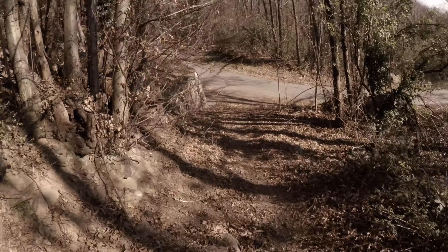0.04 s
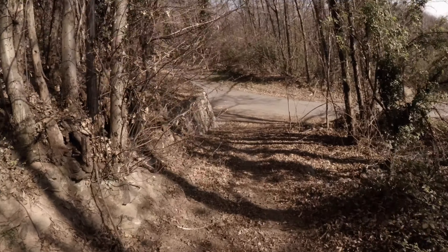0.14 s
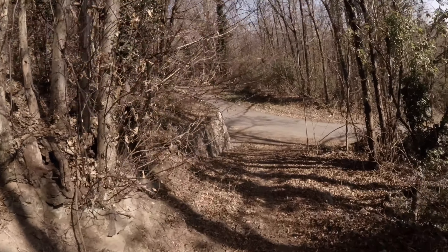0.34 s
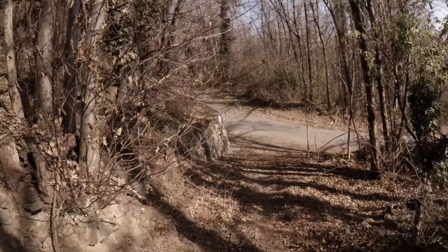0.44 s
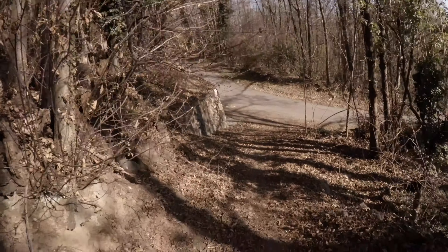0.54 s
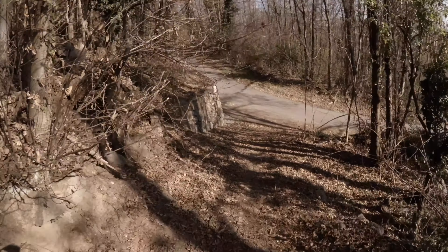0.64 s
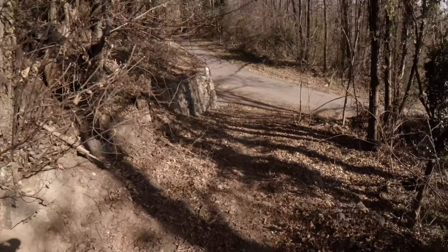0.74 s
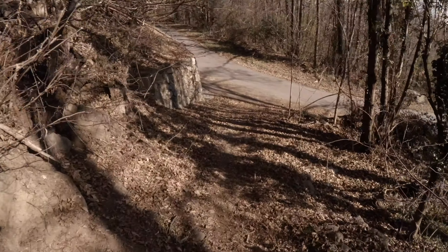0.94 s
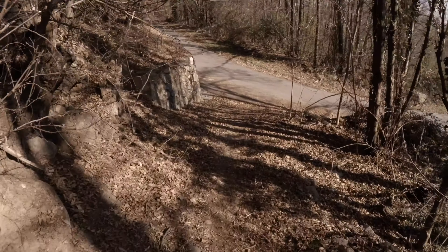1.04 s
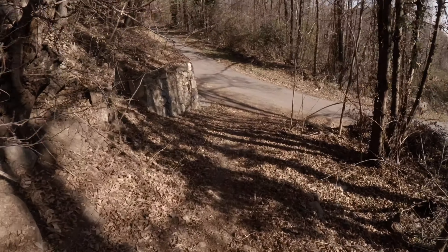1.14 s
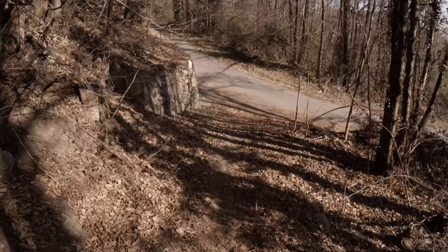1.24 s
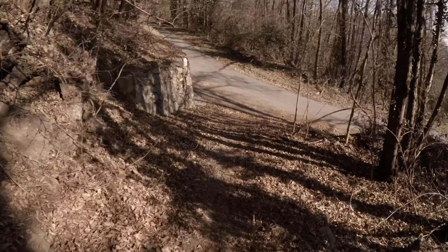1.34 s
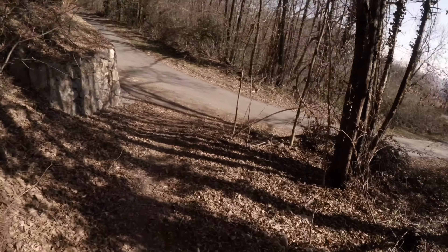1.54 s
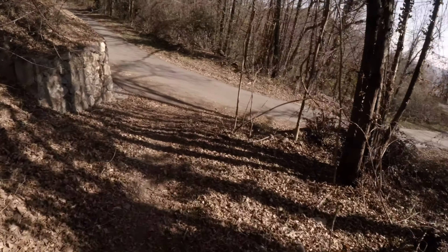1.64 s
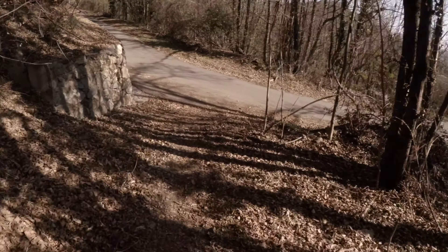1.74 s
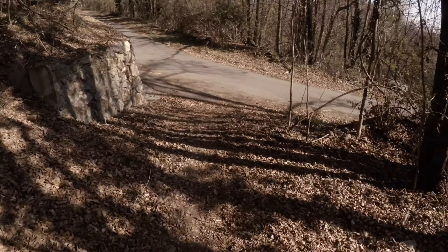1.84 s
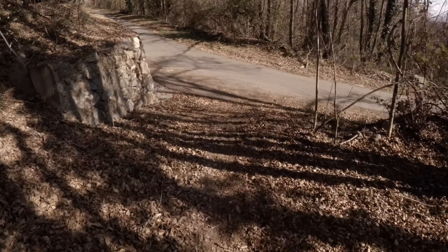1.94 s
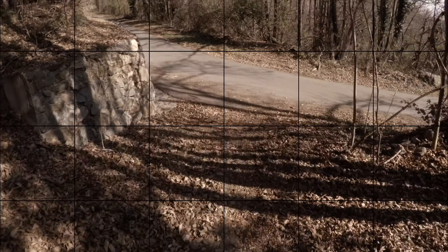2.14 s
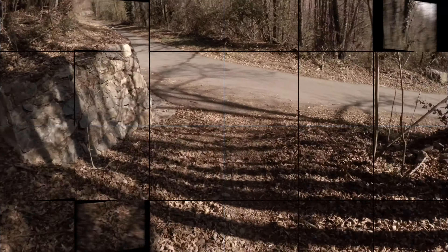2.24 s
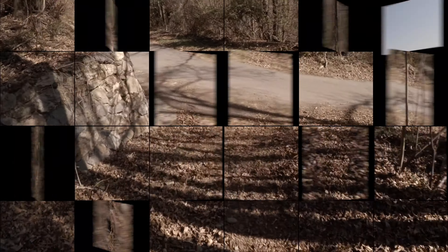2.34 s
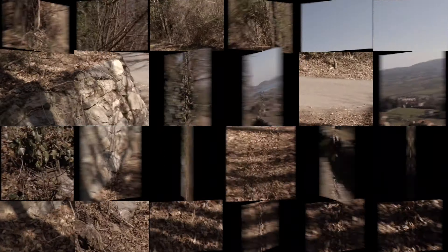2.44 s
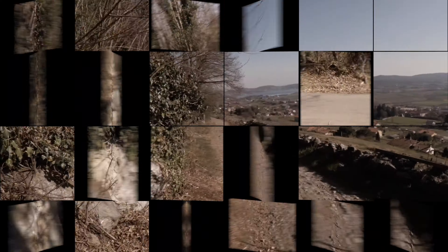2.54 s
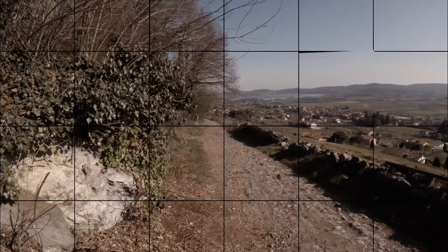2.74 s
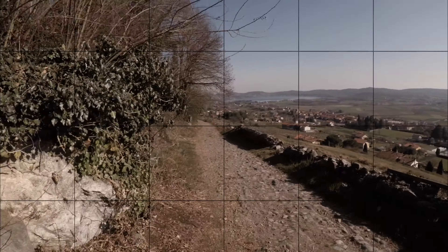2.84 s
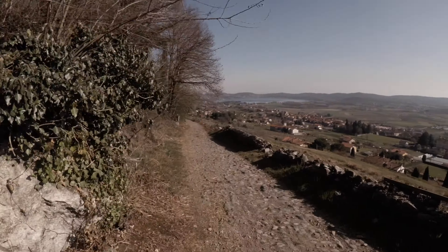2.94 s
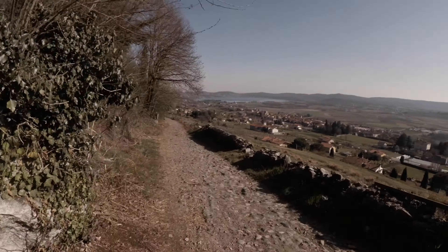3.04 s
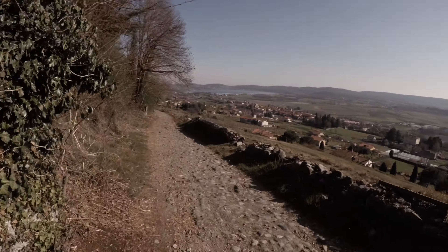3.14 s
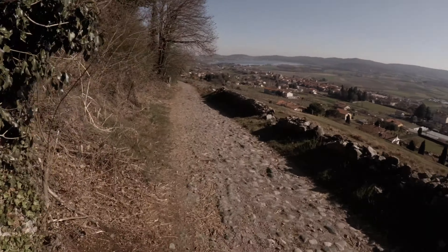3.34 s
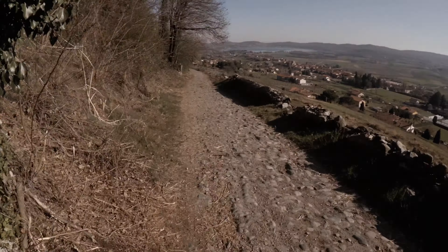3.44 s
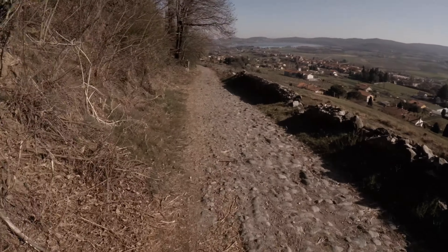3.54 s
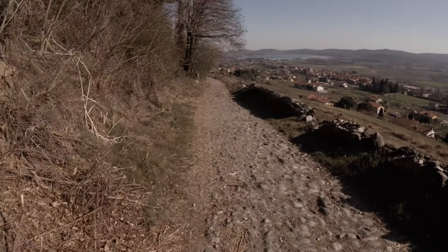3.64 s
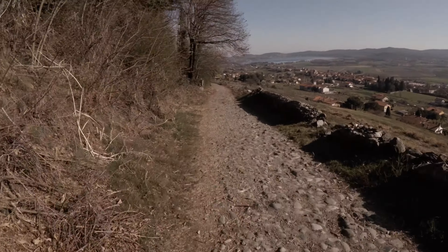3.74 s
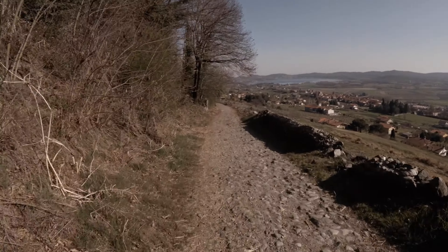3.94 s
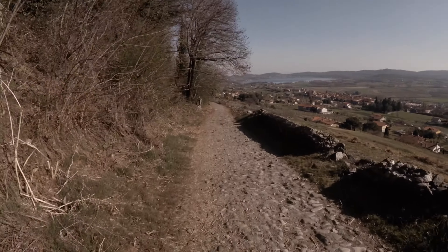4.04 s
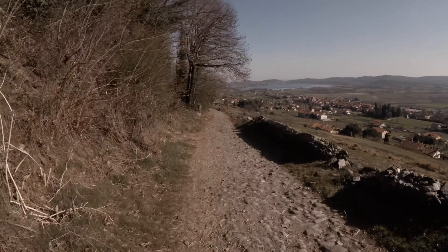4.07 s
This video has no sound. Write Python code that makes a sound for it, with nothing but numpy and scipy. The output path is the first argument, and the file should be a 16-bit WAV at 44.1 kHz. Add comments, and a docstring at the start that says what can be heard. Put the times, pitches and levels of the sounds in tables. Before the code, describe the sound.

A mountain bike coasts over leaf litter, brittle crackle spread wide, with low fluttering wind and a high ratchet whir. The leaves thin out and the bike reaches an open stony track: a heavy knock, then louder gritty tyre roll, clicking pebbles, sharp gravel ticks and deep frame rumble growing with speed. Close on-board microphone, no reverberation, image narrowing to the centre.

```python
"""Mountain bike from leaves to cobbles

A bike with a camera on board coasts through dry leaves, then rolls faster down a cobbled track.
Tyres, litter and sand are random grains shaped by spectra; stones, snaps and knocks are struck resonances.
The freewheel is a pulse train ringing a wavering tone, and wind is filtered noise swelling in gusts.
The stereo image starts wide and closes to mono as the track begins."""
import sys
import numpy as np
from scipy import signal
from scipy.fft import rfft, irfft, next_fast_len
from scipy.io import wavfile
from scipy.ndimage import uniform_filter1d, minimum_filter1d, map_coordinates

SR = 44100
rng = np.random.default_rng(int(sys.argv[2]) if len(sys.argv) > 2 else 0)


def file_out(sig):
    """Save sig as 16-bit WAV at sys.argv[1]."""
    # one column per channel
    cols = np.atleast_2d(sig).T
    # limit, then scale
    lim = np.clip(cols, -1, 1)
    pcm = np.round(lim * 32767).astype(np.int16)
    wavfile.write(sys.argv[1], SR, pcm)


N = 383229
TIME = np.arange(N) / SR  # seconds, for each sample

# Levels of layers and hits are set ahead of panning; colours give relative level within a spectrum.

# bike speed, rising and easing, faster overall by the end: [t/s, speed/(m/s)]
SPEED = [(0, 2.75), (.85, 3.1), (1.3, 5.2), (2.4, 3.07), (3.4, 5.16), (4.5, 4.5), (4.9, 6.27), (5.4, 5.3),
         (6.95, 6.56), (7.5, 6.4), (8.35, 7.6), (8.69, 7)]
# tyres on the ground: [t/s, roll level/dB, grit level/dB]
TYRES = [(0.0, -41.5, -48), (0.43, -36, -46), (1.18, -40, -44), (1.7, -41.5, -49.5), (2.15, -33.5, -45.5),
         (2.44, -35, -45), (2.73, -40.5, -45), (3.29, -40, -61), (3.53, -37, -51.5), (4.13, -33.5, -47.5),
         (4.6, -35, -45), (4.95, -30, -41.5), (5.6, -30.5, -40), (6.17, -33.5, -41), (6.55, -31.5, -39.5),
         (7.25, -29.5, -39), (7.6, -33.5, -38.5), (7.95, -33.5, -40.5), (8.34, -29, -39.5),
         (8.68, -35.5, -42.5)]
# bumps press the tyres down (+) or lift them (-): [t/s, length/s, change of level/dB]
BUMPS = [(0.51, 0.14, -16), (2.806, 0.21, -7.5), (3.316, .05, -2.5), (3.357, 0.029, 5), (3.58, 0.24, 4.5),
         (4.116, 0.022, -1), (4.154, 0.081, 4.5), (4.261, 0.032, 5), (4.838, 0.1, 2.5), (4.978, 0.034, 3.5),
         (5.579, 0.052, 4.5), (5.798, 0.078, 2), (5.88, 0.049, -2.5), (6.271, 0.16, -2.5),
         (7.133, 0.092, 0.5), (8.558, 0.051, 6), (8.664, 0.025, -6.5)]
# colour of the rolling tread: [f/Hz, level/dB]
ROLL = [(200, -37), (450, -2), (750, -1.5), (1050, 0), (1450, 2.5), (1900, -4.5), (2600, -12), (3600, -64),
        (6000, -65.5)]
# colour of the grinding grit: [f/Hz, level/dB]
GRIT = [(1000, -4.5), (2000, 4.5), (2600, 5.5), (3500, -0.5), (4700, -8), (5400, -22), (7500, -26.5),
        (14000, -68)]

# stones and sticks hit by a tyre: [t/s, peak level before softening/dB, ring f/Hz, resonance Q]
STONES = [(0.034, -16, 1250, 1.2), (0.0689, -16, 1460, 1.3), (0.2377, -5.5, 920, 1.3),
          (.5584, -13, 1980, 1.2), (0.9526, -8, 1100, 1.17), (1.403, -18, 1390, 2.2),
          (1.461, -16, 1020, 2.04), (1.956, -17.5, 1170, 2.2), (2.324, -11, 1070, 1.6),
          (2.923, -13.5, 1040, 1.16), (2.932, -16, 1000, 1.2), (3.234, -14, 880, 3.3),
          (3.248, -16.5, 615, 4), (3.283, -22, 554, 3), (3.352, -23, 1310, 3.3), (3.389, -17, 1120, 0.97),
          (3.449, -21.5, 1720, 2.4), (3.468, -17, 620, 1.9), (3.526, -12.5, 1540, 3.3),
          (3.591, -22, 1120, 2.6), (3.622, -19, 1370, 3), (3.743, 3, 990, 1.84), (3.813, -15.5, 1410, 3.8),
          (3.855, -12, 1093, 0.86), (3.984, -20, 1650, 2.1), (4.087, -10, 940, 3.6),
          (4.424, -11, 1464, 3.1), (4.479, -17, 606, 3.1), (4.582, -20, 560, 1.8), (4.658, -21, 625, 1.7),
          (4.896, -13.5, 1800, 1.6), (4.968, -15, 1140, 2), (5.068, -9.5, 1940, 1.9),
          (5.262, -15.5, 1560, 3.6), (5.35, -22, 1410, 2.5), (5.776, -17, 1190, 1.7),
          (6.003, -11.5, 1510, 1.2), (6.244, -10, 1310, 4.2), (6.311, -8.5, 1670, 1.35),
          (6.588, -12.5, 1006, 10), (6.639, -20, 640, 3.9), (6.929, -19, 1076, 7.8),
          (7.108, -16, 1290, 3.3), (7.671, -15, 660, 1.7), (7.893, -21, 1240, 2.5), (8.042, -13, 1190, 1.3),
          (8.143, -13, 785, 2), (8.213, -15.5, 840, 2.6), (8.273, -18.5, 988, 2.2), (8.54, -9, 1300, 2.5),
          (8.565, -14.5, 1400, 3), (8.634, -22, 800, 1.8), (8.648, -9, 870, 1.7)]
# sharp snaps of twigs, flung gravel and chain: [t/s, tick level/dB, ring f/Hz, edge level re tick/dB]
SNAPS = [(0.033, -25, 2820, -11), (.069, -29.5, 2880, -6), (0.2376, -20, 2940, -13), (.362, -22, 2910, -13),
         (.409, -19, 3080, -17.5), (0.5585, -21.5, 2800, 0.5), (.649, -25, 3040, -1.5),
         (.856, -19, 4300, -19), (.929, -22.5, 3800, -10), (0.9535, -25.5, 2560, 7),
         (1.076, -15, 2500, -11), (1.144, -12.5, 3190, -12), (1.178, -13.5, 3570, -11),
         (1.463, -22, 4240, -15), (2.582, -28, 4000, -4), (2.602, -24, 3020, -7), (2.623, -26.5, 3520, -9),
         (2.884, -28.5, 2330, -6), (2.921, -25, 2530, -15), (2.927, -15.5, 2900, -13),
         (2.9315, -15, 3220, -13.5), (2.936, -25, 2800, -6), (3.087, -26.5, 2540, -26),
         (3.47, -28, 2400, -19), (3.527, -33.5, 2460, 2.5), (3.73, -22, 2170, -29), (3.742, -19, 2740, -9),
         (3.855, -24, 2400, -9), (3.942, -27, 3400, -1), (3.98, -25.5, 2340, -15), (4.058, -15, 2940, -21),
         (4.26, -31, 2780, -1), (4.421, -18, 2540, -10), (4.532, -21, 2600, -28), (4.657, -18, 2360, -12),
         (4.747, -21.5, 2480, -15), (4.895, -27, 2510, -15), (4.985, -12.5, 3100, -28),
         (4.999, -12.5, 4200, -27), (5.07, -13.5, 2400, -10.5), (5.148, -25, 2960, -11),
         (5.17, -21, 2700, -26), (5.521, -26, 2430, -13), (5.642, -25, 3000, -13), (6.244, -28, 2290, -8),
         (6.31, -20, 2770, -16), (6.413, -22.5, 2800, -11), (6.849, -25, 3160, -24),
         (7.546, -21.5, 2910, -20.5), (7.712, -18.5, 2630, -30), (7.817, -19.5, 2600, -28),
         (8.044, -12.5, 2540, -32), (8.138, -15, 2900, -33), (8.151, -20, 2500, -30),
         (8.188, -20, 2900, -30), (8.193, -20.5, 4800, -26), (8.211, -14.5, 2460, -30),
         (8.471, -22, 3000, -20), (8.548, -24, 3250, -27), (8.558, -20, 3400, -28), (8.633, -21, 2400, -16)]
# short skids of the tread: [t/s, length/s, level/dB]
SKIDS = [(0.37, 0.11, -31), (1.166, 0.029, -32), (2.226, 0.018, -33), (2.928, 0.029, -23.5),
         (4.421, 0.011, -25), (8.482, 0.02, -43), (8.572, 0.04, -45)]
# colour of a skid: [f/Hz, level/dB]
SCRAPE = [(200, 7), (900, 15), (2000, 4.5), (3300, 6), (4800, -2), (7000, -14), (10000, -18.5),
          (15000, -39)]

# leaf crunch, fading towards the open track: [t/s, crunch level/dB]
LITTER = [(0, -43), (1.3, -42.5), (1.78, -49), (2.05, -50), (2.55, -53), (2.85, -55), (3.5, -95.5)]
# heaps of leaves that a tyre ploughs through: [t/s, length/s, level/dB]
LEAF_HEAPS = [(0.593, 0.028, -32), (0.788, 0.044, -37), (1.919, 0.023, -36), (2.018, 0.054, -37),
              (2.06, 0.03, -35), (2.097, 0.035, -37), (2.192, .03, -43.5), (2.228, 0.042, -36),
              (2.28, 0.046, -40.5), (2.33, 0.033, -42), (2.383, 0.04, -37)]
# colour of crushed leaves: [f/Hz, level/dB]
CRUNCH = [(2500, 4), (4500, 5), (6300, 1.5), (7500, -0.5), (9300, -4), (11000, -11.5), (13000, -14.5),
          (15000, -37.5)]
# colour of the crunch that differs between the ports: [f/Hz, level/dB]
CRUNCH_SIDE = [(900, 4), (1500, 6), (2200, 3.5), (2800, -4), (3400, -30), (4400, -0.5), (6300, 4),
               (8000, 0), (10000, -8.5), (13000, -22), (15000, -34)]
# colour of cracking leaf stalks and flung grit: [f/Hz, level/dB]
CRACKLE = [(600, -14), (1400, 9), (2400, -5.5), (4200, -2), (6500, -19), (10000, -12), (15000, -31.5)]
# sand, thickest on the first stretch of cobbles: [t/s, hiss level/dB]
SANDINESS = [(0, -73), (3.25, -63), (3.55, -57), (5.55, -58.5), (5.8, -64), (8.69, -66.5)]
# colour of the sand: [f/Hz, level/dB]
HISS = [(3000, -11.5), (4800, -7), (6000, -0.5), (7400, -8.5), (8300, 1), (9700, -2), (11200, -9.5),
        (13500, -23), (15000, -42)]

# jolts to frame and camera mount: [t/s, peak level/dB, lower mode f/Hz, upper mode re lower/(0-1)]
KNOCKS = [(0.238, -16, 340, .3), (0.74, -9, 325, 0.15), (1.884, -10, 236, 0.8), (2.325, -6.5, 323, .45),
          (2.603, -11.5, 336, 0.54), (3.25, -14.5, 240, 0.9), (3.337, -4.5, 193, 0.28),
          (3.341, -12.5, 397, .38), (3.386, -20, 225, 0.6), (3.743, 5.5, 331, .38), (3.948, -10, 360, .55),
          (3.962, -17, 380, 0.2), (4.029, -17, 365, .38), (4.425, -14.5, 333, 0.2),
          (4.478, -17.5, 326, 0.3), (4.577, -14.5, 288, 0.4), (4.663, -13.5, 256, 0.4),
          (6.062, -10.5, 224, .3), (7.669, -12, 206, 0.74), (8.217, -2.5, 340, 0.6),
          (8.529, -9.5, 370, 0.4), (8.652, -1.5, 345, 0.63)]
# tone of the hub: [t/s, pawl ring f/Hz, level/dB]
FREEWHEEL = [(0, 4140, -50), (1.3, 4240, -41), (1.7, 4340, -48.5), (2.2, 4260, -47.5), (2.8, 4330, -60),
             (3.4, 4386, -63.5), (4.3, 4860, -60), (4.42, 4690, -51.5), (5.2, 4710, -56.5),
             (7.8, 4720, -61), (8.69, 4770, -68)]
# colour of the noise that blurs the hub tone, f being the offset from it: [f/Hz, level/dB]
HUB_SHIMMER = [(180, -0.5), (330, -19), (520, -8.5), (1500, -54.0)]
# rough patches of ground that shake the frame harder: [t/s, length/s, judder level/dB]
ROUGH_PATCHES = [(1.89, 0.11, -21), (3.642, 0.073, -30), (4.48, 0.048, -21), (7.69, 0.069, -18.5)]
# colour of the low rumble: [f/Hz, level/dB]
RUMBLE = [(8, -15.5), (22, 1), (40, -2), (62, -0.5), (100, -2), (140, -8.5), (200, -20), (400, -58.5),
          (900, -100)]
# colour of the shaking frame: [f/Hz, level/dB]
JUDDER = [(70, -16.5), (150, 1.5), (220, -1.5), (330, -7), (500, -15), (800, -20), (2000, -88)]

# gusts of crosswind: [peak t/s, rise/s, fall/s, low buffet level/dB, flutter level/dB]
GUSTS = [(.47, .35, 0.17, -16, -30), (.75, 0.2, 0.57, -20, -30.5), (1.27, 0.2, 0.13, -20, -19),
         (1.52, 0.16, 0.16, -20, -14.5), (1.79, 0.11, 0.12, -25.5, -20.5), (2.72, 0.41, 0.4, -20.5, -22),
         (3.38, 0.44, 0.36, -28.5, -28)]
# colour of the low buffeting: [f/Hz, level/dB]
BUFFET = [(8, -4), (25, -6), (60, -0.5), (120, -7), (200, -15), (400, -43), (1000, -83)]
# colour of the higher flutter: [f/Hz, level/dB]
FLUTTER = [(60, -8), (160, 4.5), (260, -1.5), (400, -8), (600, -17.5), (850, -37), (1300, -27.5),
           (2200, -63), (5000, -107)]
# colour of the small eddies: [f/Hz, level/dB]
SWIRL = [(120, -36), (280, 5), (480, 0), (650, -3.5), (850, -8), (1200, -19), (2200, -39), (3500, -56.5)]
# colour of air tearing past the housing: [f/Hz, level/dB]
TEAR = [(150, -9), (260, 6), (450, 0), (720, -5), (950, -19), (1500, -48)]
# spread between the two channels: [t/s, width/(0-1)]
WIDTH = [(0, 1), (3.0, 1), (3.9, .4), (4.3, 0)]

CRUISE_M_PER_S = 5
CLICKS_PER_M = 20  # mean count of ratchet teeth passed for each metre rolled
RUMBLE_DB, RUMBLE_DB_PER_DOUBLING = -17.5, 8  # mean at cruising speed, growth per doubling of speed
JUDDER_DB, JUDDER_DB_PER_DOUBLING = -28.5, 12  # the same for the shaking of the frame
GUST_JUDDER_DB = -6  # how much a gust shakes the whole camera, relative to its flutter
SWELL_FIRST_S, SWELL_EVERY_S, SWELL_DB = 0.065, 0.268, 1.1  # the crunch swells at an even pace
# side re mid at a loud crunch; that crunch level; extra dB the side loses per dB the crunch falls
CRUNCH_SIDE_DB, LOUD_CRUNCH_DB, SIDE_FADE = 3, -42.5, 0.97
STALK_DB, FLUNG_DB = -3, -10.5  # stalks relative to the leaf crunch; flung grit relative to the grit
TEAR_DB, TEAR_GROWTH = 4, 2.08  # level at a flutter of 0 dB; power of the flutter it follows
JOSTLE_S = .025  # a shifting stone jostles its neighbours within this time
TOP_HZ = 15000


def amp(db):
    """Decibels to gain."""
    return 10 ** (np.asarray(db) / 20)


def unit(x):
    """Scale to rms 1."""
    return x / np.sqrt(np.mean(x ** 2) + 1e-20)


def curves(rows):
    """One value per sample for each column after the time."""
    s, *columns = np.transpose(rows)
    return [np.interp(TIME, s, column) for column in columns]


def wobble(rate):
    """A smooth random curve, rate knots a second."""
    knots = rng.standard_normal(int(N * rate / SR) + 4)
    return map_coordinates(knots, [TIME * rate])


def swell(s, length):
    """A bell of height 1 around time s."""
    return np.exp(-np.minimum((2 * (TIME - s) / length) ** 2, 40))


def swells(rows):
    """The summed gain of bells given as time, length and level."""
    return sum(amp(db) * swell(s, length) for s, length, db in rows)


def noise(*channels):
    """White noise, in one channel or several."""
    return rng.standard_normal((*channels, N))


def filtered(x, response):
    """x times a response of frequency."""
    m = next_fast_len(N + 8192)
    gain = response(np.fft.rfftfreq(m, 1 / SR))
    return irfft(rfft(x, m) * gain, m)[..., :N]


def coloured(x, colour):
    """x with the spectrum of a colour table, at rms 1."""
    f, db = np.transpose(colour)
    return unit(filtered(x, lambda hz: amp(np.interp(np.log(hz + 1), np.log(f), db))))


def resonate(x, hz, q):
    """x through one resonance."""
    b, a = signal.iirpeak(min(hz, SR / 3), max(q, .6), SR)
    return signal.lfilter(b, a, x)


def add(track, s, sound):
    """Mix a sound into a track from time s."""
    part = track[..., max(round(s * SR), 0):][..., :sound.shape[-1]]
    part += sound[..., :part.shape[-1]]


def grains(rate, spread_db):
    """Impacts at random moments, rate a second on average, with random sizes and signs, at rms 1."""
    size = amp(spread_db * np.minimum(rng.standard_exponential(N), 4))
    struck = rng.random(N) < rate / SR
    return unit(struck * size * rng.choice([-1, 1], N))


def pair(mid, side, pan_db):
    """Left and right from a shared and an opposed part; positive pan_db favours the left."""
    return np.array([(mid + side) * amp(pan_db / 2), (mid - side) * amp(-pan_db / 2)])


def contact(hz, q, t60, scuff, crack):
    """An impact through a resonance, at peak 1: a broad crack, then surfaces that scuff and die away."""
    t = np.arange(SR // 12) / SR
    push = scuff * rng.standard_normal(len(t)) * amp(-60 * t / t60)
    push[0] = 1
    broad = resonate(push, hz, q / 2)
    ring = resonate(broad, hz, q) + crack / q * broad
    return ring / np.abs(ring).max()


def doublings():
    """Speed as doublings of the cruising speed."""
    speed, = curves(SPEED)
    return np.log2(np.maximum(speed, .1) / CRUISE_M_PER_S)


def tyres():
    """The tread grinds over stones and grit in quick uneven surges and knocks pebbles together."""
    bump_db = sum(db * swell(s, length) for s, length, db in BUMPS)
    roll_db, grit_db = curves(TYRES) + bump_db
    surge = wobble(28)
    roll, aside = (coloured(grains(rate=480, spread_db=2.7) + .72 * noise(), ROLL) for _ in range(2))
    grit = coloured(grains(rate=520, spread_db=2.7) + .9 * noise(), GRIT)
    load = amp(roll_db + surge + 0.37 * wobble(8.5))
    coarse = 0.92 * roll + 0.4 * pebbles(count=150, size=4)
    grinding = amp(grit_db + 0.88 * surge + 1.2 * wobble(60)) * grit
    return pair(load * coarse + grinding, 0.04 * load * aside, pan_db=-6.0)


def pebbles(count, size):
    """Small stones click together in clusters of a few, each stone at its own pitch, at rms 1."""
    out, t = np.zeros(N), np.arange(SR // 40) / SR
    for k, cluster in enumerate(rng.random((count, size, 4))):
        start = (k + cluster[0, 0]) / count * N / SR
        for _, delay, pitch, weight in cluster:
            hz = 800 * 3.7 ** pitch
            decay = amp(-60 * t * hz / 11)  # down 60 dB after 11 cycles
            onset = 1 - np.exp(-t / 0.00044)
            ring = np.sin(2 * np.pi * hz * t) * decay * onset
            add(out, start + JOSTLE_S * delay, amp(5.8 * weight ** 2 - 3 * pitch) * ring)
    return unit(out)


def stones():
    """Loose stones clack under the tyres: a low Q gives a dry crack, a high Q scuffs and rings on."""
    out = np.zeros(N)
    for s, db, hz, q in STONES:
        add(out, s, amp(db) * contact(hz, q, t60=0.028, scuff=0.044 * min(q, 2.4), crack=.2))
    # rubber softens the blow
    softened = filtered(out, lambda hz: 1 / (1 + (hz / 4500) ** 4))
    return pair(softened, 0, pan_db=1)


def snaps():
    """Twigs, gravel and chain give bright resonant ticks with a crisp higher edge."""
    ticks, edges = np.zeros(N), np.zeros(N)
    for s, db, hz, edge_db in SNAPS:
        add(ticks, s, amp(db) * contact(hz, q=2.03, t60=0.038, scuff=0.1, crack=0.11))
        add(edges, s, amp(db + edge_db) * contact(5800, q=2.0, t60=0.014, scuff=0.22, crack=.1))
    rounded = filtered(ticks, lambda hz: 1 / (1 + (hz / 5600) ** 8))
    return pair(rounded + edges, 0.39 * edges, pan_db=0.5)


def skids():
    """The tread slips for a moment and rasps over the ground in dense grains."""
    mid, side = (coloured(grains(rate=2200, spread_db=2), SCRAPE) for _ in range(2))
    return swells(SKIDS) * pair(mid, 0.2 * side, pan_db=-4.5)


def leaves():
    """Brittle leaves break in clumps; the crunch starts wide and narrows as it grows quieter."""
    litter_db, = curves(LITTER)
    pulse = np.cos(2 * np.pi * (TIME - SWELL_FIRST_S) / SWELL_EVERY_S)
    litter = amp(litter_db + SWELL_DB * pulse)
    around = litter * amp(CRUNCH_SIDE_DB + SIDE_FADE * (litter_db - LOUD_CRUNCH_DB))
    mid, side = (coloured(grains(rate=2200, spread_db=-1.0) + noise(), colour)
                 for colour in (CRUNCH, CRUNCH_SIDE))
    # the heaps crackle more coarsely
    crushed = coloured(grains(rate=1300, spread_db=2.5) + .45 * noise(), CRUNCH)
    clumps = amp(1.85 * wobble(39.78))
    shared = clumps * litter * mid + swells(LEAF_HEAPS) * crushed
    return pair(shared, clumps * around * side, pan_db=-0.5)


def crackle():
    """Single stalks crack in the litter and bits of grit flick off the tread, as sparse grains."""
    litter_db, = curves(LITTER)
    _, grit_db = curves(TYRES)
    stalks = coloured(grains(rate=130, spread_db=3), CRACKLE)
    flung = coloured(grains(rate=45, spread_db=2.5), CRACKLE)
    # grit sounds duller than stalks
    flung = unit(filtered(flung, lambda hz: 1 / (1 + (hz / 4200) ** 6)))
    return pair(amp(litter_db + STALK_DB) * stalks + amp(grit_db + FLUNG_DB) * flung, 0, pan_db=9.0)


def sand():
    """A thin spray of sand hisses off the tread, mostly on the open track."""
    hiss_db, = curves(SANDINESS)
    spray = coloured(grains(rate=830, spread_db=-0.5) + 1.2 * noise(), HISS)
    return pair(amp(hiss_db + 0.9 * wobble(17)) * spray, 0, pan_db=-0.5)


def knocks():
    """A hard jolt excites two modes of frame and mount that start opposed, beat and die away."""
    out, t = np.zeros(N), np.arange(SR // 8) / SR
    for s, db, hz, upper_share in KNOCKS:
        lower = np.sin(2 * np.pi * hz * t) * amp(-60 * t / 0.045)
        upper = np.sin(2 * np.pi * 1.342 * hz * t) * amp(-60 * t / 0.031)
        swing = lower - upper_share * upper
        add(out, s, amp(db) * swing / np.abs(swing).max())
    return pair(out, 0.46 * out, pan_db=-11.5)


def freewheel():
    """Pawls drop over the ratchet teeth, faster with speed, and ring the hub briefly."""
    ring_hz, db = curves(FREEWHEEL)
    speed, = curves(SPEED)
    rate = CLICKS_PER_M * speed
    teeth_passed = np.cumsum(rate * (1 + .09 * wobble(45))) / SR
    since_click = teeth_passed % 1 / rate  # seconds
    strength = amp(1.6 * wobble(70))
    clicks = strength * amp(-60 * since_click / 0.027) * (1 - np.exp(-since_click / 0.00023))
    shimmer = coloured(noise(2), HUB_SHIMMER)
    phase = 2 * np.pi * np.cumsum(ring_hz) / SR
    tone = shimmer[0] * np.cos(phase) + shimmer[1] * np.sin(phase)
    return pair(amp(db) * unit(clicks * tone), 0, pan_db=3.0)


def rumble():
    """Headwind and cobbles shake the camera, more with speed; gusts and rough patches add judder."""
    pace, (_, flutter) = doublings(), gusts()
    low = coloured(noise(), RUMBLE)
    # gain control evens out the largest low swings
    power = uniform_filter1d(uniform_filter1d(low ** 2, round(0.026 * SR)), round(0.024 * SR))
    swing = np.sqrt(np.abs(power))
    low = unit(low / (swing + 0.13) ** 0.62)
    bumps = coloured(grains(rate=260, spread_db=3) + 0.89 * noise(), JUDDER)
    headwind = amp(RUMBLE_DB + RUMBLE_DB_PER_DOUBLING * pace + 0.7 * wobble(8.8))
    rolling = amp(JUDDER_DB + JUDDER_DB_PER_DOUBLING * pace + 0.75 * wobble(8))
    shaking = np.hypot(rolling, amp(GUST_JUDDER_DB) * flutter)
    return headwind * low + np.hypot(shaking, swells(ROUGH_PATCHES)) * bumps


def gusts():
    """Each gust rises and falls smoothly: gains of the low buffet and of the flutter."""
    power = 1e-12
    for s, rise, fall, buffet_db, flutter_db in GUSTS:
        shape = swell(s, 2 * np.where(TIME < s, rise, fall))
        power = power + np.outer(amp([buffet_db, flutter_db]), shape) ** 2
    return np.sqrt(power)


def port_wind():
    """Eddies hit each microphone port separately, the right one harder, as low buffet and higher flutter."""
    push, flutter = gusts()
    buffet = push * amp(0.37 * wobble(5.0)) * coloured(noise(2), BUFFET) * amp([[-5.5], [3]])
    eddies = coloured(noise(2), FLUTTER) * amp([[-4], [3]])
    # an eddy passing between the ports pushes one and pulls the other; stronger flutter brings more
    along, between = (coloured(noise(), SWIRL) for _ in range(2))
    swirl = amp(3.0) * flutter ** 0.31 * pair(0.082 * along, between, pan_db=-3.5)
    return buffet + flutter * amp(3.2 * wobble(29.75)) * (eddies + swirl)


def tearing():
    """At the height of a gust the air tears past the housing in rough, rapid bursts of noise."""
    _, flutter = gusts()
    bursts = unit(amp(5 * wobble(55)) * coloured(noise(), TEAR))
    return pair(amp(TEAR_DB) * flutter ** TEAR_GROWTH * bursts, 0, pan_db=-4.0)


def scene():
    """Bicycle and wind, in the open air."""
    ground = tyres() + stones() + snaps() + skids() + leaves() + crackle() + sand()
    bicycle = knocks() + freewheel() + rumble()
    wind = port_wind() + tearing()
    return ground + bicycle + wind


def record(dry):
    """The stereo width follows its table, the highest peaks are held down and the band is limited."""
    width, = curves(WIDTH)
    mid = dry.mean(axis=0)
    narrowed = mid + width * (dry - mid)
    needed = np.minimum(1, .95 / (np.abs(narrowed).max(axis=0) + 1e-9))
    # 10 ms windows smooth the gain around each peak
    gain = uniform_filter1d(minimum_filter1d(needed, size=441), size=441)
    return filtered(narrowed * gain, lambda hz: hz < TOP_HZ)


dry = scene()
out = record(dry)
file_out(out)
```